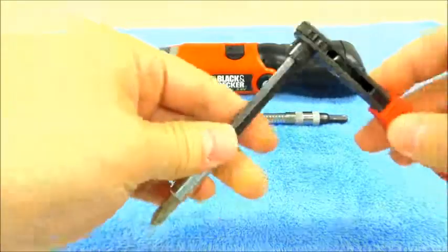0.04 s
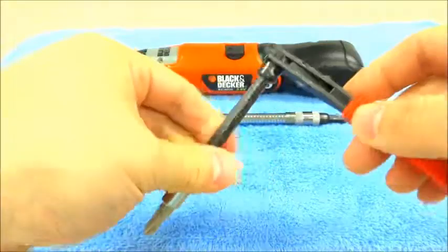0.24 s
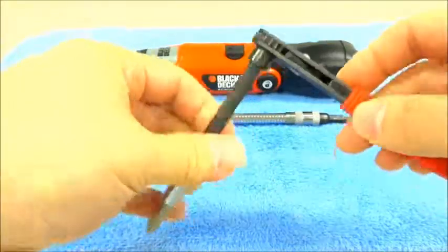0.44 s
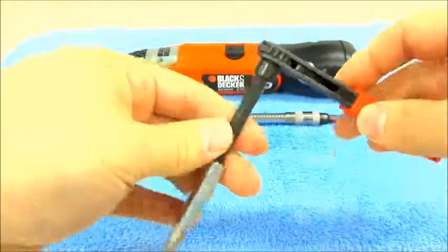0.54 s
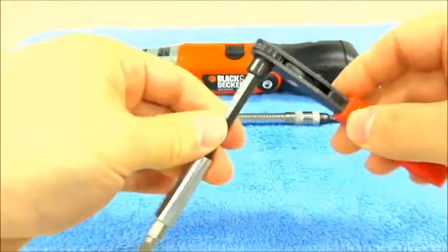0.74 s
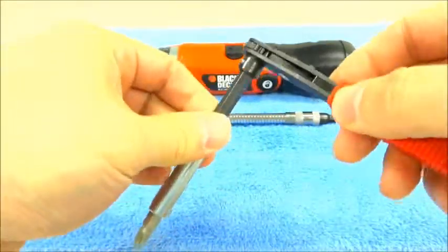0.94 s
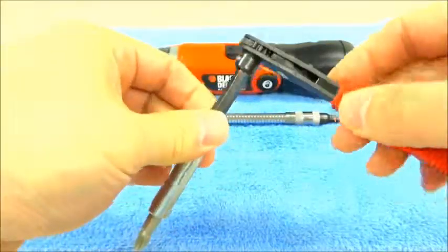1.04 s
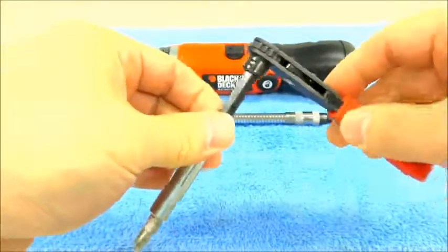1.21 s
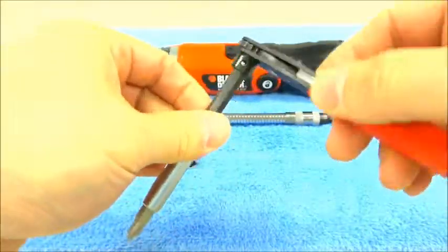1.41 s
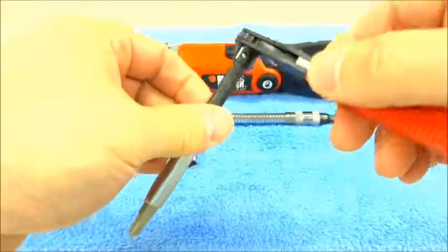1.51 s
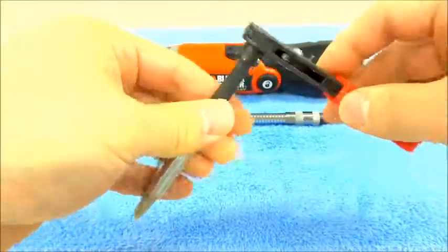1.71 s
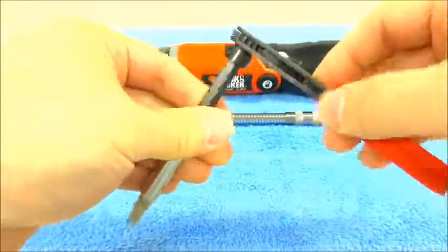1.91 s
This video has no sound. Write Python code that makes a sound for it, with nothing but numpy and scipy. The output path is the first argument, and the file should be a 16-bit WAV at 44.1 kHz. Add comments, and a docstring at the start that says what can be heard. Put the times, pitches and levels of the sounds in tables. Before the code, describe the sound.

A small hand ratchet clicks close up, sharp and bright, with a slight scrape and a brief steel ring. A rapid run of about ten clicks comes from 0.2 to 0.5 seconds, another from 0.8 to 1.0, and a shorter, softer one around 1.5. Faint single ticks fall near 1.1, 1.7 and 1.9 seconds. A quiet rumble and appliance hum fill the small room throughout.

```python
"""Hand ratchet in a small room

A small ratchet is swung back three times, close up: its pawl scrapes and snaps over the teeth in quick
runs, with faint ticks of play between strokes. The steel rings briefly and a humming room answers.
A camera's gain control ducks the room noise under every run of clicks and recovers only partly."""
import sys
import numpy as np
from scipy import signal
from scipy.fft import rfft, irfft, next_fast_len
from scipy.io import wavfile
from scipy.ndimage import uniform_filter1d, minimum_filter1d, map_coordinates

SR = 44100
rng = np.random.default_rng(int(sys.argv[2]) if len(sys.argv) > 2 else 0)


def bounce(signal):
    """Save signal as a 16-bit WAV file at the path given by the first command-line argument."""
    frames = np.transpose(np.atleast_2d(signal))
    limited = np.clip(frames, -1, 1)
    pcm = np.round(limited * 32767).astype(np.int16)
    wavfile.write(sys.argv[1], SR, pcm)


N = 85995
LEAD_S = 0.005  # run-up before each snap

# Pawl snaps and ticks of play, plus a few slides of the pawl over a tooth (near 0.819, 1.467 and 1.5045 s).
# Each row: start in seconds, level in dB, chatter length in seconds (the decay sets in at 91% of it),
# brightness in dB per octave.
CLICKS = [(0.2355, -22, 0.0011, 2), (0.2458, 2, 0.0033, -1), (0.2796, 2, 0.0011, -1),
          (0.3043, 1.5, 0.0011, 1), (0.3253, 3.5, 0.0014, -1.5), (0.3415, 7.5, 0.0019, 0),
          (0.3546, 1.5, 0.0017, -3.5), (0.3682, 1, 0.0006, -3.5), (0.384, 3, 0.00068, -1.3),
          (0.404, 3.5, 0.0006, 4.5), (0.4355, 2, 0.0013, -0.8), (0.497, -13, 0.0009, 0),
          (0.819, -32, 0.0008, 2), (0.8367, -5.5, 0.00067, -0.2), (0.8457, -6.5, 0.0015, 1),
          (0.8541, 1, 0.00048, 2), (0.872, 1, 0.0014, -0.1), (0.916, 3.5, 0.0009, -0.2),
          (0.942, 2, 0.0012, 0.7), (0.9616, 5.5, 0.0012, 0), (0.9754, 5.5, 0.00068, 1.2),
          (0.9957, 0.5, 0.0025, -0.7), (1.1132, -9, 0.00037, 1), (1.3217, -39, 0.0008, -3),
          (1.341, -26.5, 0.00055, -1.5), (1.4092, -37, 0.0008, 2), (1.4442, -9.5, 0.0011, -2.5),
          (1.4671, -15, 0.0023, 12), (1.4734, -2.5, 0.0011, -1.6), (1.5045, -15.5, 0.0035, 1.5),
          (1.5325, -2, 0.0028, -4), (1.6625, -22, 0.00079, -6.5), (1.732, -36, 0.00084, -6),
          (1.929, -24.5, 0.00082, -2.5), (1.9372, -36, 0.0038, -7)]
# How freely the steel rings as the fingers shift their grip. Each row: time in seconds, ring gain in dB.
GRIP = [(.25, -1), (.45, -6), (.85, -0.5), (1.0, 0.5), (1.11, -10), (1.5, 3)]

def ratchet():
    """Each click is a pawl snap or slide plus the ring of the steel, answered by the room."""
    out = np.zeros((2, N))
    for start, db, chatter_s, tilt_db in CLICKS:
        mid, side = pawl_snap(db, chatter_s, tilt_db)
        grip_db = np.interp(start, *np.transpose(GRIP))
        click = np.pad(amp(grip_db) * steel_ring(), (round(LEAD_S * SR), 0))
        add(click, 0, mid)
        heard = signal.fftconvolve(click[None], room_response(), axes=1)
        add(heard, 0, amp(-18) * np.array([side, -side]))  # left and right hear the snap differently
        add(out, start - LEAD_S, amp(db) * heard)
    return out


# The bright colour of pawl on tooth. Each row: frequency in Hz, relative level in dB.
PAWL_COLOUR = [(100, -50), (400, -34), (1550, -29.5), (2250, -14.5), (3000, -12), (3750, -15), (4700, -5),
               (6200, -6.5), (8100, -2), (9200, -3), (10300, 0), (11500, 1), (13000, -6), (15700, -7),
               (19000, -29)]
# Soft ticks lose their top. Each row: frequency in Hz, share of the dulling.
SOFT_DULLING = [(11500, 0), (13500, 0.89)]

def pawl_snap(db, chatter_s, tilt_db, size=1024):
    """The pawl rides up a tooth, drops and chatters: a noise burst, returned as mid and side."""
    ride_s, rise_s, chatter_t60_s = 0.00079, 0.00027, 0.0082
    t = np.arange(size) / SR - LEAD_S
    hz = np.fft.rfftfreq(size, 1 / SR)
    ride = amp(-14.5) * np.exp(-np.abs(t) / ride_s)
    decay = amp(-60 * np.maximum(t - 0.91 * chatter_s, 0) / chatter_t60_s)
    drop = np.clip(t / rise_s, 0, 1) * decay
    tooth_db = 1.5 * np.interp(hz, np.linspace(0, SR / 2, 36), rng.standard_normal(36))  # no two alike
    bright_db = tilt_db * np.log2(np.maximum(hz, 2000) / 9000)
    dull_db = 0.5 * max(-7.5 - db, 0) * along(SOFT_DULLING, hz)  # only ticks below -7.5 dB
    colour = minimum_phase(along(PAWL_COLOUR, hz) + bright_db - dull_db + tooth_db)
    burst = (ride + drop) * rng.standard_normal((2, size))
    snap = irfft(rfft(burst) * colour)
    return snap / np.linalg.norm(snap, axis=1, keepdims=True) * np.sqrt(0.0012 * SR)


# Modes of the steel head and bit. Each row: frequency in Hz, relative level in dB, T60 in seconds.
STEEL_MODES = [(5180, -10.5, 0.34), (8010, 6, 0.044), (10770, -4, .17), (10880, -6, 0.23),
               (11060, 0.5, 0.35), (10960, -6.5, 0.21), (11450, -8.5, 0.13)]

def steel_ring(level_db=-29, vary_db=2, blur_rad=0.14):
    """The steel's modes, struck a little differently each time and blurred by the grip."""
    t = np.arange(SR // 2) / SR
    ring = 0
    for hz, db, t60 in STEEL_MODES:
        drift = blur_rad * np.cumsum(rng.standard_normal(len(t)))
        envelope = amp(db + rng.normal(0, vary_db) - 60 * t / t60)
        ring = ring + envelope * np.sin(2 * np.pi * hz * t + drift)
    return amp(level_db) * ring


# Back strokes of the handle. Each row: start in seconds, end in seconds, relative level in dB.
BACK_STROKES = [(0.212, 0.435, -34), (0.815, 0.997, -26.5), (1.421, 1.547, -36)]

def pawl_scrape(level_db=-2.5, swell_s=0.023, rough_db=5.5):
    """The pawl slides grittily on the wheel, swelling as each stroke gets going."""
    t = np.arange(N) / SR
    strokes = sum(amp(db) * np.clip((t - start) / swell_s, 0, 1) * (t < end)
                  for start, end, db in BACK_STROKES)
    friction = rng.standard_normal(N) * amp(rough_db * wobble(330))
    grit = unit_rms(filtered(friction, lambda hz: amp(along(PAWL_COLOUR, hz))))
    scrape = amp(level_db) * strokes * grit
    return signal.fftconvolve(scrape[None], room_response(), axes=1)[:, :N]


# Slaps off the near walls. Each row: delay in seconds, level in dB.
WALL_ECHOES = [(.0092, -21), (0.012, -21)]
# Length of the room's tail. Each row: frequency in Hz, T60 in seconds.
TAIL_T60 = [(300, 0.24), (2000, 0.3), (5300, 0.39), (11000, 0.3), (15000, 0.14)]
# Tone of the tail. Each row: frequency in Hz, relative level in dB.
TAIL_COLOUR = [(300, 4), (2200, 5.5), (4200, -2), (5300, -1.5), (6200, -2.5), (9500, -2.5), (11000, -2),
               (12300, -4), (15500, 1)]

def room_response(tail_db=-11, width_db=-14):
    """A small room's stereo impulse response: direct sound, near walls and a diffuse tail."""
    hz, t, spectrum = signal.stft(rng.standard_normal((2, SR // 2)), SR, nperseg=256)
    spectrum *= amp(along(TAIL_COLOUR, hz)[:, None] - 60 * t / along(TAIL_T60, hz)[:, None])
    tail = signal.istft(spectrum, SR, nperseg=256)[1]
    tail *= np.minimum(np.arange(tail.shape[1]) / SR / 0.004, 1)  # 4 ms fade-in
    mid, side = amp(tail_db) * tail / np.linalg.norm(tail[0])
    mid[0] += 1  # direct sound
    for delay, db in WALL_ECHOES:
        add(mid, delay, amp([db]))
    return np.array([mid + amp(width_db) * side, mid - amp(width_db) * side])


# The bed of room noise. Each row: frequency in Hz, relative spectral density in dB.
RUMBLE_COLOUR = [(15, -59), (25, -23), (91, -20), (107, -16), (241, -4.5), (269, -5), (527, -8), (637, -14),
                 (749, -13.5), (1180, -14), (2200, -24), (3390, -29), (6490, -36), (13800, -38),
                 (15800, -46)]
# Its stereo width. Each row: frequency in Hz, side over mid in dB.
RUMBLE_WIDTH = [(30, -25), (140, -12.5), (280, -14), (600, -4.5), (1200, -6.5), (3000, -2), (10000, -16.5)]

def room_rumble(level_db=-38):
    """Steady, dark room noise, nearly mono in the bass."""
    mid, side = filtered(rng.standard_normal((2, N)), lambda hz: amp(along(RUMBLE_COLOUR, hz)))
    side = filtered(side, lambda hz: amp(along(RUMBLE_WIDTH, hz)))
    return amp(level_db) * unit_rms(np.array([mid + side, mid - side]))


# The drone of an appliance. Each row: frequency in Hz, RMS level in dB.
HUM_TONES = [(120, -58.5), (241, -50), (300, -56), (376, -54), (524, -48.5), (727, -59.5)]

def appliance_hum(waver_db=3, drift_rad=1.1, whine_hz=13600, whine_db=-77):
    """A running appliance: low tones and a faint whine, each wavering in level and phase."""
    t = np.arange(N) / SR
    hum = 0
    for hz, db in HUM_TONES + [(whine_hz, whine_db)]:
        level = amp(db + waver_db * wobble(7.81))
        hum = hum + level * np.sin(2 * np.pi * hz * t + drift_rad * wobble(7))
    return np.sqrt(2) * hum


def amp(db):
    """Decibels to gain."""
    return 10 ** (np.asarray(db) / 20)


def unit_rms(x):
    """Scale to an RMS of 1."""
    return x / np.sqrt(np.mean(x ** 2) + 1e-20)


def along(points, hz):
    """Read a curve of (Hz, value) points on a log frequency axis."""
    freqs, values = np.transpose(points)
    return np.interp(np.log(hz + 1), np.log(freqs + 1), values)


def wobble(rate):
    """A smooth random curve with `rate` knots a second."""
    return map_coordinates(rng.standard_normal(N // 100), [np.arange(N) * rate / SR], mode="wrap")


def filtered(x, response):
    """Equalise x with a gain given as a function of Hz."""
    size = next_fast_len(N + SR // 2)
    return irfft(rfft(x, size) * response(np.fft.rfftfreq(size, 1 / SR)), size)[..., :N]


def minimum_phase(db):
    """A frequency response with these gains and no pre-ring."""
    cepstrum = irfft(np.log(amp(db)))
    half = len(cepstrum) // 2
    cepstrum[1:half] *= 2
    cepstrum[half + 1:] = 0
    return np.exp(rfft(cepstrum))


def add(track, start_s, sound):
    """Mix a sound into a track."""
    part = track[..., max(round(start_s * SR), 0):][..., :sound.shape[-1]]
    part += sound[..., :part.shape[-1]]


def scene():
    """The ratchet's clicks and scrape over rumble and hum."""
    return ratchet() + pawl_scrape() + room_rumble() + appliance_hum()


def release(cut_db, db_per_s):
    """Catch each gain cut and let it go at a steady rate."""
    ramp = db_per_s * np.arange(N) / SR
    return np.maximum.accumulate(cut_db + ramp) - ramp


def record(dry):
    """Gain control ducks on loud clicks; half the cut lifts fast, half lingers. A steep low-pass follows."""
    threshold_db, squeeze, top_hz = -22, 0.52, 16000
    power = np.abs(uniform_filter1d(dry.mean(0) ** 2, size=66))
    duck_db = squeeze * np.maximum(10 * np.log10(power + 1e-12) - threshold_db, 0)
    cut_db = np.maximum(release(duck_db, db_per_s=73.5), release(0.5 * duck_db, db_per_s=1.1))
    gain_db = uniform_filter1d(minimum_filter1d(-cut_db, size=88), size=44)  # look ahead, then smooth
    return filtered(dry * amp(gain_db), lambda hz: 1 / np.sqrt(1 + (hz / top_hz) ** 240))


dry = scene()
out = record(dry)
bounce(out)
```